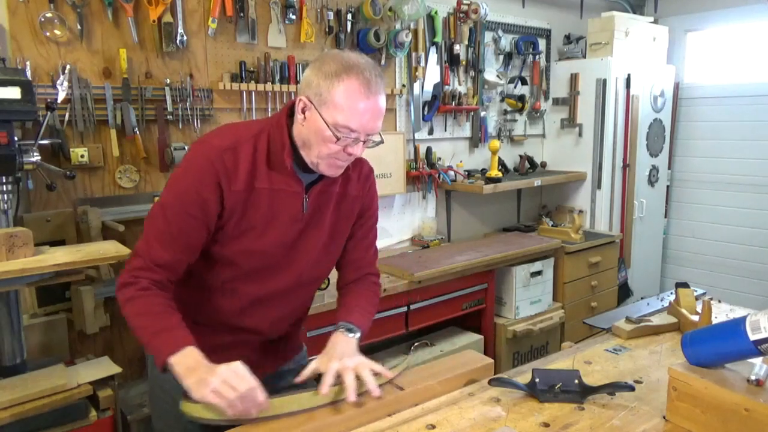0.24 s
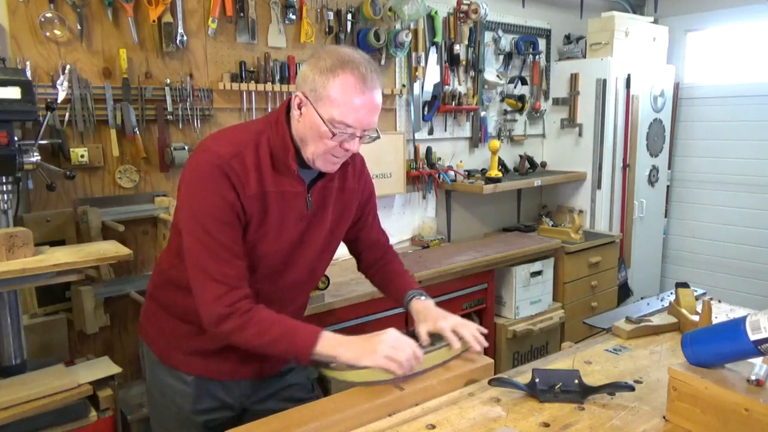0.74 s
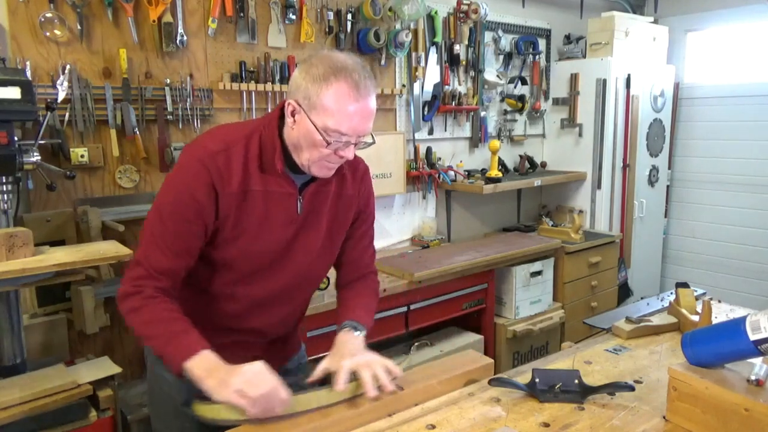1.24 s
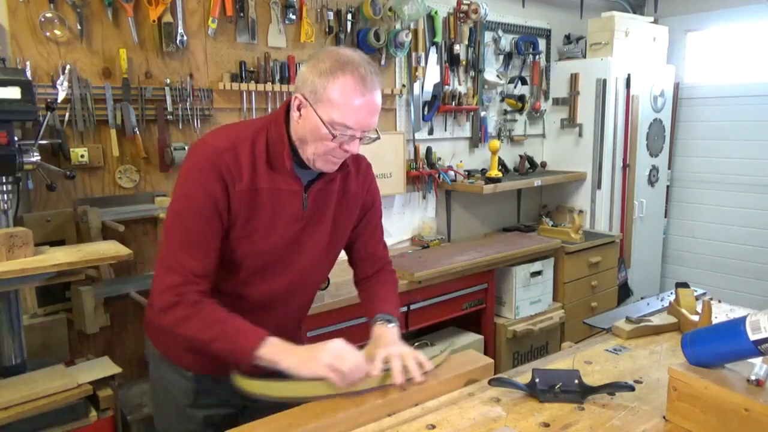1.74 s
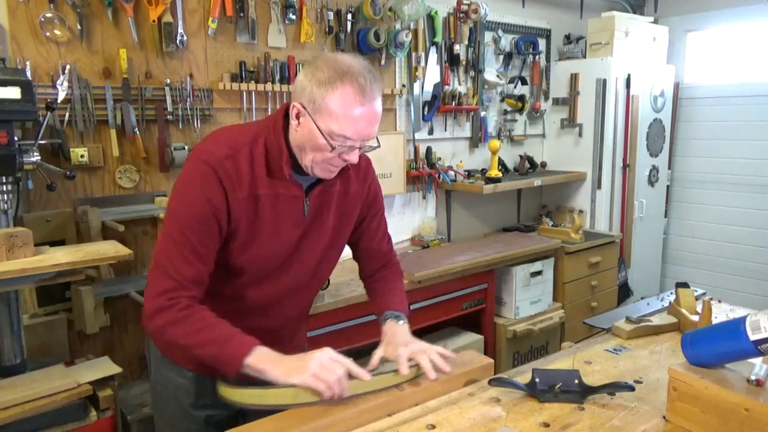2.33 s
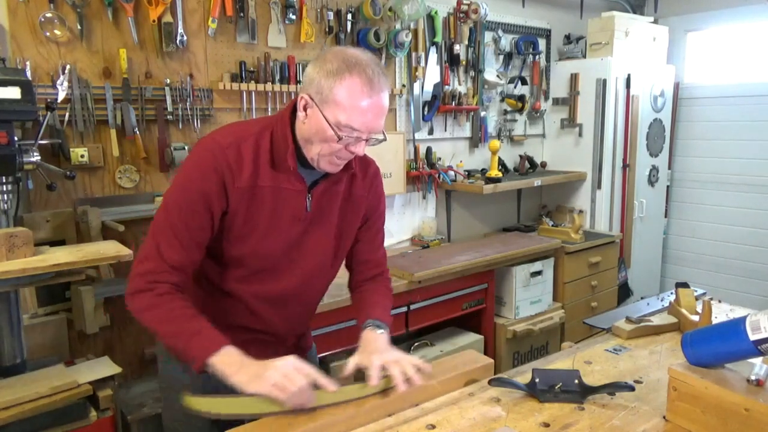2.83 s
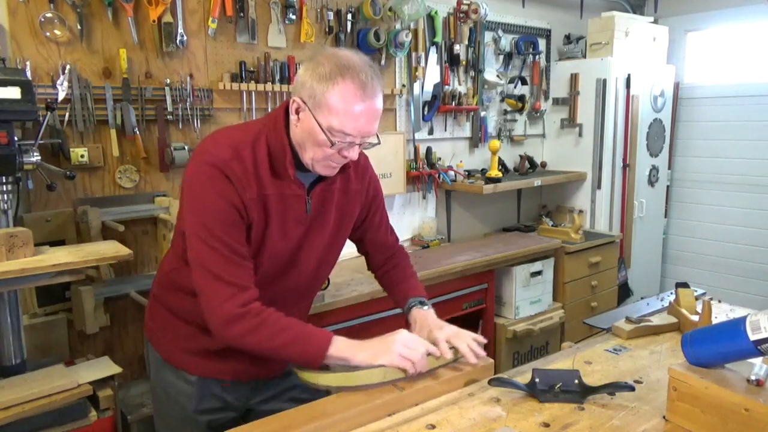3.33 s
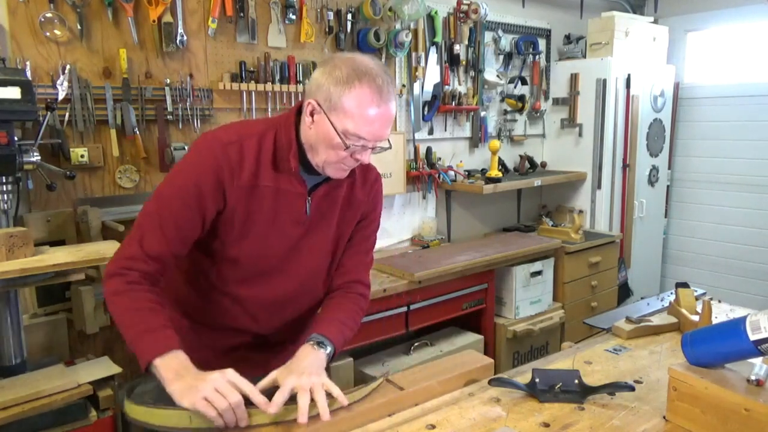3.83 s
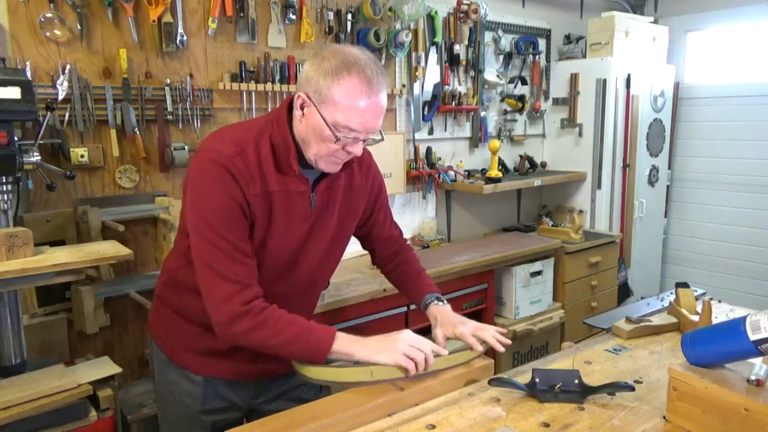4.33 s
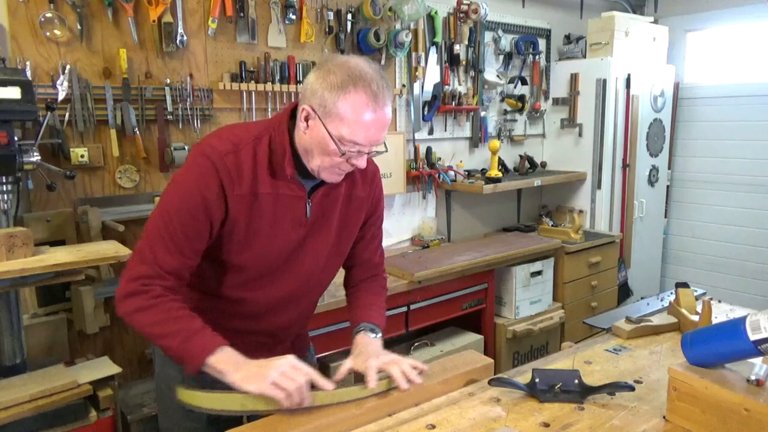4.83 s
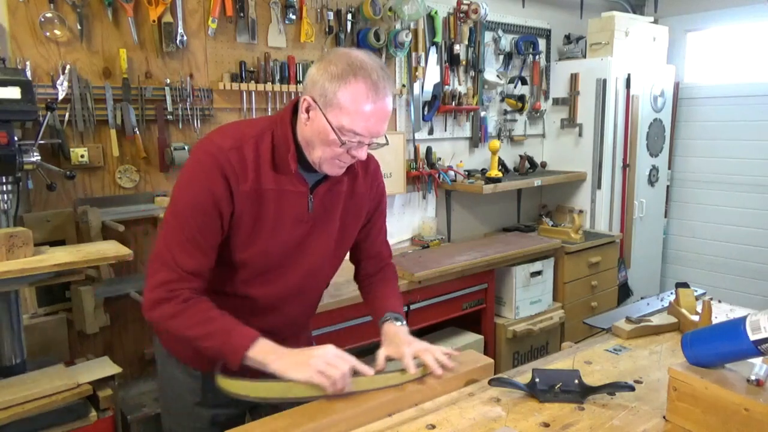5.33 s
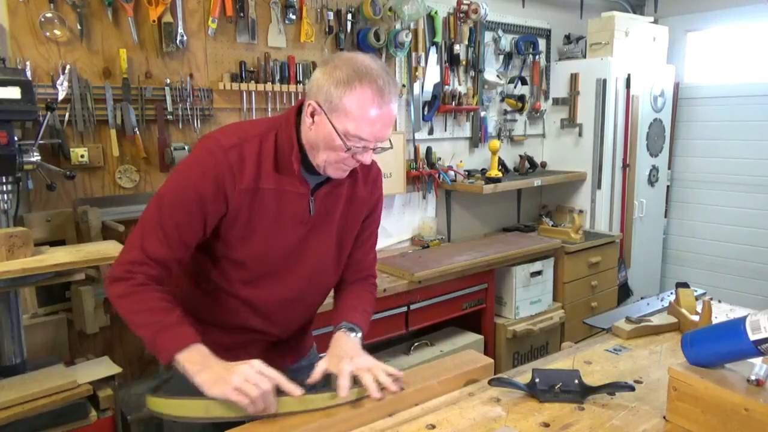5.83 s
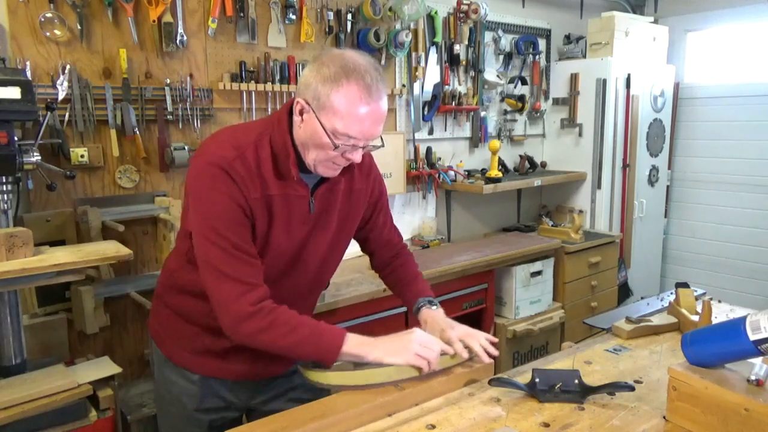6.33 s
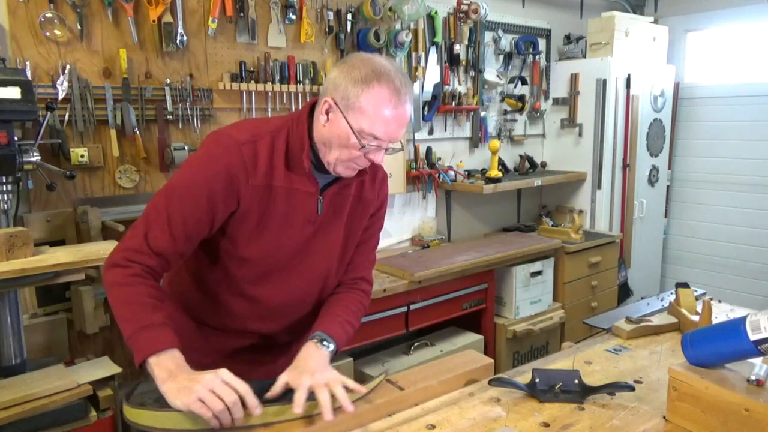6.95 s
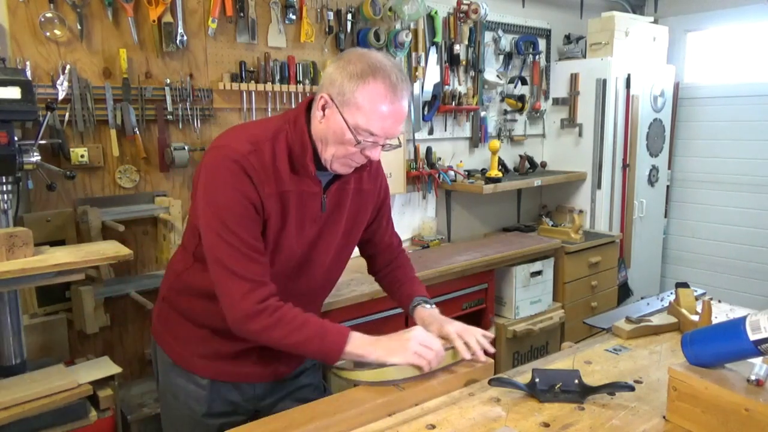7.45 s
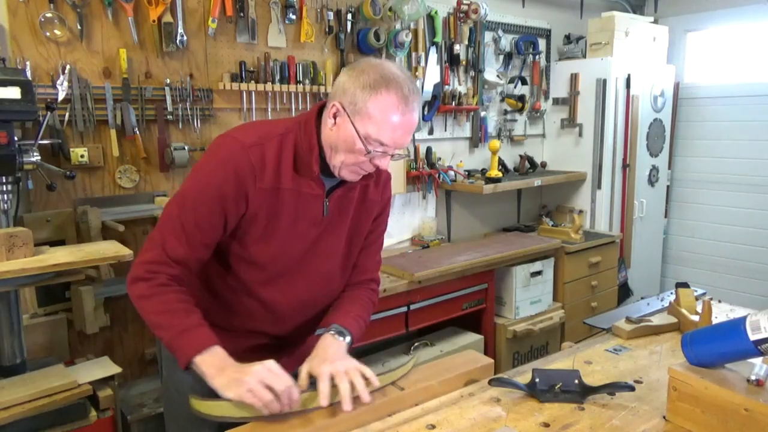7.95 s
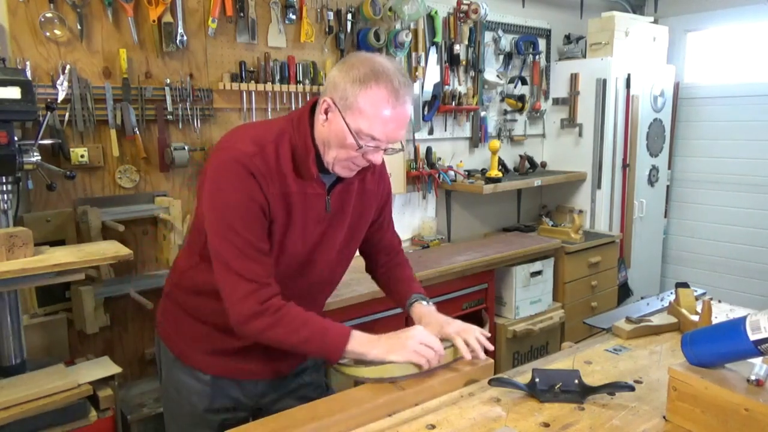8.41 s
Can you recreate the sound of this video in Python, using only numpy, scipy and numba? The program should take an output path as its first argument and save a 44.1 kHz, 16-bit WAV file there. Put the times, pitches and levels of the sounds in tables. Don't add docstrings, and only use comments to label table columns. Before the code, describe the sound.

In a cluttered workshop, a thin strip of wood is pushed over a plane blade about once a second. Each cut starts as a bright hiss, digs into a raspy woody tone and rings metallically near its end. Quiet slides, scuffs and knocks fill the gaps. A loud catch comes early while a distant machine winds down. Close stereo microphone, short room echo, low rumble leaning left.

```python
import sys
import numpy as np
from scipy import signal
from scipy.fft import rfft, irfft, next_fast_len
from scipy.io import wavfile
from scipy.ndimage import uniform_filter1d, minimum_filter1d
from numba import njit

SR = 44100
rng = np.random.default_rng(int(sys.argv[2]) if len(sys.argv) > 2 else 0)


def transcribe(u):
    v = np.clip(np.atleast_2d(u).T, -1, 1)
    q = np.round(v * 32767).astype(np.int16)
    wavfile.write(sys.argv[1], SR, q)


def volts_from_decibels(level):
    exponent = np.asarray(level, float) / 20
    return 10 ** exponent


N = 382728

# frequency in Hz, width in Hz, level in dB.
STRIP_MODES = [(590, 120, -14.5), (603, 47, -6.5), (748, 174, -6.5), (839, 130, -1.5), (926, 75, -0.5),
               (1006, 81, -0.5), (1110, 94, -2), (1250, 200, -5), (1432, 196, -4), (1714, 184, -2),
               (1855, 200, -0.5), (1990, 280, -2.5), (2263, 240, -1.5), (2606, 760, -7)]
# frequency in Hz, width in Hz, level in dB.
IRON_MODES = [(2900, 370, -4), (3574, 640, 0.5), (3958, 580, 6.5), (4206, 810, 5), (4830, 1560, -4)]
# frequency in Hz, width in Hz, level in dB.
SHAVING_MODES = [(5876, 1080, -3), (6897, 1510, -2.5), (7190, 496, 1.5), (10050, 6700, -8),
                 (10760, 1820, 0), (11200, 2400, -14.5)]
# frequency in Hz, width in Hz, level in dB.
BENCH_MODES = [(188, 120, -24), (249, 144, -12.5), (303, 50, -14), (410.4, 91, -6.5), (425.5, 41, -4),
               (503.6, 26, -0.5), (632, 283, 3), (703, 222, 4.5)]
# start in seconds, length in seconds, skimming hiss in dB,
# delay until the iron digs in, in seconds, wood level once dug in, in dB.
CUTS = [
    (-0.1, 0.11, -12.5, .3, -21),
    (0.129, 0.24, -15.5, 0.12, -16),
    (1.078, 0.29, -9, 0.12, -12.5),
    (2.2, 0.34, -14, 0.041, -13.5),
    (3.425, 0.32, -13, 0.064, -12.5),
    (4.458, 0.3, -18, 0.06, -15.5),
    (6.419, 0.36, -15.5, 0.035, -13.5),
    (7.805, 0.24, -12.5, 0.13, -12.5),
    (8.591, .3, -8.5, .2, -19),
]
# start in seconds, iron level in dB.
BITES = [
    (1.076, -17),
    (3.421, -22.5),
    (6.408, -19),
    (7.804, -25),
    (8.589, -17),
]
# start in seconds, length in seconds, hiss in dB,
# wood relative to hiss in dB, iron relative to hiss in dB.
SCUFFS = [(0.088, .02, -14.5, -5.5, -11), (0.0, 0.057, -34.5, 2.5, 2), (0.772, 0.038, -18.5, -2.5, -5),
          (1.792, 0.011, -27, -3, -15), (1.724, 0.086, -28.5, -4.5, -7), (1.829, 0.02, -18.5, -8, -13),
          (1.851, 0.043, -19.5, -4, -11), (1.899, 0.098, -21.5, -5, -8), (2.161, 0.03, -20.5, -8.5, -8),
          (2.726, 0.0062, -26.5, -4, -14), (2.891, 0.079, -19.5, -5.5, -6.5),
          (3.091, 0.056, -17.5, -9.5, -10.5), (4.039, 0.02, -28, -0.5, -11), (4.238, 0.038, -25, -3, -10),
          (4.924, 0.031, -16, -4, -2.5), (5.319, 0.022, -23.5, -5, -10), (5.693, 0.032, -14, -1.5, 1.5),
          (5.98, 0.049, -19.5, -3, -7), (6.19, 0.046, -21, -3.5, -5.5), (6.938, 0.0091, -35, -17, -12),
          (7.21, 0.036, -32.5, 5.5, -11), (7.448, 0.048, -17.5, -6.5, -11.5), (7.53, 0.02, -32, -1.5, -6),
          (8.15, 0.1, -27, -10, -9)]
# start in seconds, length in seconds, hiss in dB,
# change along the slide in dB, wood relative to hiss in dB.
SLIDES = [(0.488, 0.26, -29, 2, -5.5), (0.685, 0.088, -27, 9, -8.5), (0.984, 0.067, -41.5, 11.5, -6),
          (1.57, 0.2, -34.5, 8, -9), (2.74, 0.13, -42, 14.5, -5.5), (2.963, 0.13, -21, -4, -8.5),
          (3.323, 0.085, -31.5, 8, -7.5), (3.926, 0.17, -33, 4.5, -6.5), (4.044, 0.22, -30.5, -2.5, -5.5),
          (4.291, 0.063, -25, -8, -2), (4.413, 0.046, -38.5, 13, -8), (4.775, 0.14, -23, -6, -7),
          (5.161, 0.14, -36, 8.5, -7), (5.35, 0.12, -26, -6, -5.5), (5.513, 0.17, -34.5, 8.5, -4.5),
          (5.87, 0.115, -33, 8, -6), (6.026, 0.15, -26.5, -1, -6), (6.354, .06, -30, 0, -7),
          (6.986, 0.093, -34, 5.5, -13), (7.092, 0.13, -28.5, -8, -10.5), (7.218, 0.23, -32, 4, -5.5),
          (7.7, 0.06, -35.5, 11.5, -6.5), (8.245, 0.13, -19.5, 2.5, -7), (8.528, 0.042, -33.5, 9.5, -7.5)]
# time in seconds, spread in seconds,
# bench level in dB, centre of the strip's loud region in Hz.
PRESSES = [(0.27, 0.053, -41, 1600), (7.39, 0.15, -48, 1860), (7.875, 0.045, -43, 2170),
           (8.3, .06, -40.5, 1970), (0.37, 0.035, -18.5, 940), (0.79, 0.11, -39.5, 1510),
           (1.3, 0.02, -28, 1170), (1.96, 0.074, -37, 1050), (2.249, 0.024, -22, 1220),
           (2.33, 0.035, -25, 874), (2.51, 0.026, -34, 1070), (0.0, 0.034, -27.5, 1490),
           (3.465, 0.019, -30, 1050), (3.66, 0.12, -33, 1190), (4.33, 0.11, -36, 990),
           (4.46, 0.008, -26, 1150), (4.569, 0.025, -24, 1190), (4.679, 0.032, -19.5, 850),
           (4.77, .03, -37, 1480), (5.4, 0.033, -39, 1080), (4.93, 0.029, -30, 1090),
           (6.001, 0.045, -38, 1550), (6.21, 0.07, -36.5, 1050), (6.5, 0.05, -37, 1020),
           (6.635, 0.031, -35, 1030), (7.22, 0.025, -39, 1250), (7.58, 0.048, -33.5, 760),
           (7.76, .015, -32.5, 1400), (8.063, 0.043, -21.5, 880), (8.14, 0.02, -45, 900)]
# time in seconds, spread in seconds, iron level in dB.
SINGING = [
    (2.25, 0.061, -30.5),
    (0.28, 0.07, -17),
    (1.34, 0.04, -16.5),
    (2.49, 0.054, -17),
    (3.68, 0.053, -16),
    (4.78, 0.021, -20),
    (5.77, 0.028, -25),
    (6.72, 0.059, -15.5),
    (6.85, .05, -34),
    (8.0, 0.039, -18),
]
# time in seconds, spread in seconds, ring in Hz,
# extra ring level in dB.
CURLS = [(0.19, 0.065, 7640, 13), (0.33, .03, 6500, 7), (0.77, .03, 6900, 13), (1.18, 0.069, 7300, 9.5),
         (1.35, 0.03, 5960, 5), (1.87, 0.026, 7160, 14), (2.35, 0.058, 7400, 8), (3.5, 0.11, 7300, 4),
         (4.58, 0.06, 7300, 11), (6.62, 0.072, 7150, 8), (7.47, 0.04, 6900, 14), (7.89, 0.057, 7020, 7),
         (8.3, 0.057, 6870, 16), (8.65, 0.064, 7000, 3.5)]
# start in seconds, peak level in dB, pitch in Hz.
KNOCKS = [
    (0.126, -18, 2410),
    (0.255, 16, 1590),
    (0.495, 3, 930),
    (2.725, -15, 990),
    (3.11, 6.5, 1100),
    (4.944, -20, 1110),
    (5.72, 4, 2020),
    (6.008, -15, 1550),
    (7.774, -2, 1310),
    (8.374, 1.5, 2420),
]
# time in seconds, second order in Hz, second order in dB, third order in dB.
COASTING = [(0, 94, -42, -52), (.4, 88, -55, -57), (.9, 80, -53.5, -50.5), (1.2, 77, -66, -56),
            (1.7, 72, -57, -68), (2.4, 67, -61, -79), (3.2, 62, -68, -77)]
# frequency in Hz, density in dB per Hz.
AIR_SPECTRUM = [(15, -51), (25, -21), (108, -9), (160, -12.5), (263, -8), (492, -4), (620, -28),
                (1320, -120)]
# frequency in Hz, left minus right in dB.
LEAN = [(25, 3), (60, 2), (125, 23), (300, 40), (630, 4.5), (1120, 2.5), (2020, 0.5), (11700, -0.25)]
# frequency in Hz, left-right likeness from 0 to 1.
LIKENESS = [(25, .55), (60, 0.87), (130, 0.77), (270, 0.86), (580, 0.98), (1220, 0.97), (4000, 0.97),
            (11700, 0.96)]
# frequency in Hz, gain in dB.
CONVERTER_EDGE = [(11010, 0), (11040, -14), (11250, -34), (11500, -60), (12300, -110)]

BITE_DB_PER_S, SLIDE_IN_DB_PER_S = 1600, 508
LIFT_DB_PER_S, LIFT_DROP_DB, TRAIL_DB_PER_S = 900, 8, 138
DIG_S, SKIM_WOOD_DB, CUT_IRON_DB = 0.026, -8.5, -12.5
CLOG_AT, CLOG_S, CLOG_DB = 0.64, 0.031, -3
BITE_S, BITE_WOOD_DB = 0.065, -14
SAG_DB_PER_S, SLIDE_IRON_DB = 40, -5.5
REST_HISS_DB, REST_WOOD_DB, REST_IRON_DB, REST_BENCH_DB = -40.5, -45, -47, -44.5
BENCH_RE_WOOD_DB = -20.5
SKIM_HZ, DUG_HZ, SCUFF_HZ, SLIDE_HZ = 1670, 1434, 1550, 1150
FRESH_CURL_HZ, CLOGGED_CURL_HZ, LOOSE_CURL_HZ = 7400, 6500, 6900
CURL_DB, CURL_PER_HISS, CURL_PER_WOOD = -1.5, 0.72, 0.23
MEAN_HISS_DB = -20
RING_DB, RING_FOLLOWS = 7, 0.65


def planing():
    *gains, strip_hz, curl_hz, curl_db, ring_db, focus = handling()
    judder = volts_from_decibels(1.36 * drift(35))

    strip = body(judder * fibres(3000, spread_db=2.0), STRIP_MODES, patchy_db=2.5, rate=20.0)
    strip = 0.35 * (1 - focus) * strip + gliding(strip, strip_hz, 1.41, SR)

    hiss = body(judder * fibres(9000, spread_db=2.5), SHAVING_MODES, patchy_db=1.5, rate=13.7)
    hiss = 1.67 * hiss + volts_from_decibels(curl_db) * gliding(hiss, curl_hz, 8.2, SR)

    iron = body(judder * fibres(7000, spread_db=3.0), IRON_MODES, patchy_db=0.8, rate=12)
    iron = iron + volts_from_decibels(ring_db) * resonance(iron, hz=4290, width=230)

    bench = body(judder * fibres(3000, spread_db=2.5), BENCH_MODES, patchy_db=2.0, rate=10.8)
    bench = signal.sosfilt(signal.butter(2, 220, "high", fs=SR, output="sos"), bench)

    bodies = (hiss, strip, iron, bench)
    return sum(gain * evened(x, 0.097) for x, gain in zip(bodies, gains))


def fibres(per_s, spread_db):
    size_db = spread_db * np.minimum(rng.exponential(1, N), 5)
    sizes = volts_from_decibels(size_db) * rng.choice([-1, 1], N)
    return sizes * (rng.random(N) < per_s / SR) + 1e-18


def body(force, modes, patchy_db, rate):
    out = 0
    for k, (hz, width, db) in enumerate(modes):
        gain = volts_from_decibels(db + patchy_db * drift(rate))
        out = out + (-1) ** k * gain * resonance(force, hz, width)
    return out


def resonance(x, hz, width):
    r = np.exp(-np.pi * width / SR)
    zeros = [(1 - r * r) / 2, 0, (r * r - 1) / 2]
    poles = [1, -2 * r * np.cos(2 * np.pi * hz / SR), r * r]
    return signal.lfilter(zeros, poles, x)


@njit
def gliding(x, hz, sharpness, sr):
    out, low, band = np.empty_like(x), 0.0, 0.0
    for i in range(len(x)):
        g = np.tan(np.pi * hz[i] / sr)
        high = (x[i] - (1 / sharpness + g) * band - low) / (1 + g / sharpness + g * g)
        out[i] = (g * high + band) / sharpness
        low += 2 * g * (g * high + band)
        band += 2 * g * high
    return out


def drift(rate):
    r = np.exp(-40 * np.pi * rate / SR)
    noise = rng.standard_normal(N // 20 + 2002)
    slow = signal.lfilter([1], [1, -2 * r, r * r], noise)[2000:]
    return np.interp(np.arange(N) / 20, np.arange(len(slow)), rms_one(slow))


def evened(x, seconds):
    return x / np.sqrt(uniform_filter1d(x ** 2, int(seconds * SR)) + 1e-12)


def rms_one(x):
    return x / np.sqrt(np.mean(x ** 2) + 1e-20)


def handling():
    t = np.arange(0, N / SR + 0.002, 0.001)
    rest = (REST_HISS_DB, REST_WOOD_DB, REST_IRON_DB, SLIDE_HZ, LOOSE_CURL_HZ)
    parts = [rest] + cuts(t) + bites(t) + scuffs(t) + slides(t)
    columns = [np.array([c + 0 * t for c in column]) for column in zip(*parts)]
    hiss, wood, iron = (volts_from_decibels(db) ** 2 for db in columns[:3])
    strip_hz = np.average(columns[3], axis=0, weights=wood)
    curl_hz = np.average(columns[4], axis=0, weights=hiss)
    hiss, wood, iron = hiss.sum(axis=0), wood.sum(axis=0), iron.sum(axis=0)
    hiss_db, wood_db = 10 * np.log10(hiss), 10 * np.log10(wood)

    curl_db = CURL_DB + CURL_PER_HISS * (hiss_db - MEAN_HISS_DB) - CURL_PER_WOOD * (wood_db - hiss_db)
    for s, spread, hz, db in CURLS:
        tight = np.exp(-((t - s) / spread) ** 2 / 2)
        curl_hz = curl_hz + (hz - curl_hz) * tight
        curl_db = curl_db + db * tight

    for s, spread, db in SINGING:
        iron = iron + volts_from_decibels(db) ** 2 * np.exp(-((t - s) / spread) ** 2)
    ring_db = RING_DB + RING_FOLLOWS * (10 * np.log10(iron) - hiss_db)

    bench = volts_from_decibels(REST_BENCH_DB) ** 2 + volts_from_decibels(BENCH_RE_WOOD_DB) ** 2 * wood
    focus = 0 * t
    for s, spread, db, hz in PRESSES:
        press = np.exp(-((t - s) / spread) ** 2)
        bench = bench + volts_from_decibels(db) ** 2 * press
        strip_hz = strip_hz + (hz - strip_hz) * np.sqrt(press)
        focus = np.maximum(focus, 0.7 * np.sqrt(press))
    gains = np.sqrt([hiss, wood, iron, bench])
    return in_time(np.transpose([t, *gains, strip_hz, curl_hz, curl_db, ring_db, focus]))


def cuts(t):
    parts = []
    for s, length, hiss_db, dig, wood_db in CUTS:
        on = contact(t - s, length, BITE_DB_PER_S)
        dug = step(t - s - dig, DIG_S)
        clogged = step(t - s - CLOG_AT * length, CLOG_S)
        skim_db = hiss_db + SKIM_WOOD_DB
        hiss = on + hiss_db + CLOG_DB * clogged
        wood = on + skim_db + (wood_db - skim_db) * dug
        iron = on + wood_db + CUT_IRON_DB
        strip_hz = SKIM_HZ + (DUG_HZ - SKIM_HZ) * dug
        curl_hz = FRESH_CURL_HZ + (CLOGGED_CURL_HZ - FRESH_CURL_HZ) * clogged
        parts.append((hiss, wood, iron, strip_hz, curl_hz))
    return parts


def bites(t):
    parts = []
    for s, db in BITES:
        sag = SAG_DB_PER_S * np.clip(t - s, 0, BITE_S)
        on = db + contact(t - s, BITE_S, BITE_DB_PER_S) - sag
        parts.append((on + BITE_WOOD_DB, on + BITE_WOOD_DB, on, SKIM_HZ, FRESH_CURL_HZ))
    return parts


def scuffs(t):
    parts = []
    for s, length, db, wood_db, iron_db in SCUFFS:
        sag = SAG_DB_PER_S * np.clip(t - s, 0, length)
        on = db + contact(t - s, length, BITE_DB_PER_S) - sag
        parts.append((on, on + wood_db, on + iron_db, SCUFF_HZ, LOOSE_CURL_HZ))
    return parts


def slides(t):
    parts = []
    for s, length, db, change_db, wood_db in SLIDES:
        change = change_db * np.clip((t - s) / length, 0, 1)
        on = db + contact(t - s, length, SLIDE_IN_DB_PER_S) + change
        parts.append((on, on + wood_db, on + wood_db + SLIDE_IRON_DB, SLIDE_HZ, LOOSE_CURL_HZ))
    return parts


def contact(t, length, rise):
    after = np.maximum(t - length, 0)
    lift = np.maximum(-LIFT_DB_PER_S * after, -LIFT_DROP_DB - TRAIL_DB_PER_S * after)
    return rise * np.minimum(t, 0) + lift * (after > 0)


def step(t, seconds):
    return 0.5 + 0.5 * np.tanh(2 * t / seconds)


def in_time(rows):
    s, *columns = np.transpose(rows)
    return [np.interp(np.arange(N) / SR, s, c) for c in columns]


def knocks():
    out = np.zeros(N)
    t = np.arange(int(0.06 * SR)) / SR
    for s, db, hz in KNOCKS:
        crack = rng.standard_normal(len(t)) * volts_from_decibels(-60 * t / 0.07)
        splinters = signal.lfilter([1, -1], [1, -0.9], crack)
        sound = 0.3 * splinters + 1.3 * resonance(crack, hz, 300)
        i = round(s * SR)
        out[i:i + len(t)] += volts_from_decibels(db - 8.5) * sound
    return out


def tail(t60, dull_hz):
    t = np.arange(int(0.6 * SR)) / SR
    pole = np.exp(-2 * np.pi * dull_hz / SR)
    echoes = signal.lfilter([1], [1, -pole], rng.standard_normal(len(t)))
    echoes = echoes * volts_from_decibels(-60 * t / t60)
    return echoes / np.sqrt(np.sum(echoes ** 2))


def machine():
    hz, two_db, three_db = in_time(COASTING)
    turn = np.pi * np.cumsum(hz) / SR
    orders = volts_from_decibels(two_db) * np.sin(2 * turn) + volts_from_decibels(three_db) * np.sin(3 * turn)
    hum = volts_from_decibels(-60) * rms_one(resonance(rng.standard_normal(N), hz=100.2, width=6.3))
    return np.sqrt(2) * orders + hum


def air():
    hz = np.fft.rfftfreq(N, 1 / SR)
    shaped = rfft(rng.standard_normal(N)) * volts_from_decibels(at_hz(AIR_SPECTRUM, hz))
    return volts_from_decibels(-47.5) * rms_one(irfft(shaped, N))


def at_hz(points, hz):
    table_hz, values = np.transpose(points)
    return np.interp(np.log(hz + 1), np.log(table_hz), values)


def scene():
    work = planing() + knocks()
    room = signal.fftconvolve(work, tail(t60=0.48, dull_hz=6000))[:N]
    mid = work + volts_from_decibels(-9.5) * room + machine() + air()
    side = signal.fftconvolve(mid, tail(t60=0.12, dull_hz=13000))[:N]

    size = next_fast_len(N + 8192)
    hz = np.fft.rfftfreq(size, 1 / SR)
    alike = np.clip(at_hz(LIKENESS, hz), 0, 1)
    lean = volts_from_decibels(at_hz(LEAN, hz))
    mid = rfft(mid, size)
    own = rfft(side, size) * np.sqrt((1 - alike) / (1 + alike))
    side = mid * (lean - 1) / (lean + 1) + own
    return irfft(np.array([mid + side, mid - side]), size)[:, :N]


def low_pass(x):
    return signal.sosfilt(signal.butter(12, 12330, fs=SR, output="sos"), x)


def record(dry):
    hold = int(0.006 * SR)
    peak = -minimum_filter1d(-np.abs(dry).max(axis=0), hold)
    gain = np.minimum(1, volts_from_decibels(-2.4) / (peak + 1e-9)) ** 0.8
    x = dry * uniform_filter1d(gain, hold)

    squared = x.mean(axis=0) ** 2
    x = x + 0.15 * signal.sosfilt(signal.butter(2, 55, "high", fs=SR, output="sos"), squared)

    size = next_fast_len(N + 4096)
    edge = volts_from_decibels(at_hz(CONVERTER_EDGE, np.fft.rfftfreq(size, 1 / SR)))
    mix = irfft(rfft(x, size) * edge, size)[:, :N]
    return low_pass(mix)


dry = scene()
out = record(dry)
transcribe(out)
```